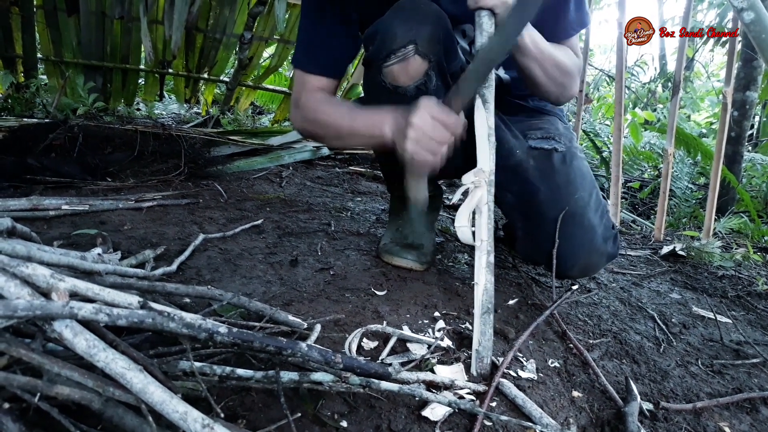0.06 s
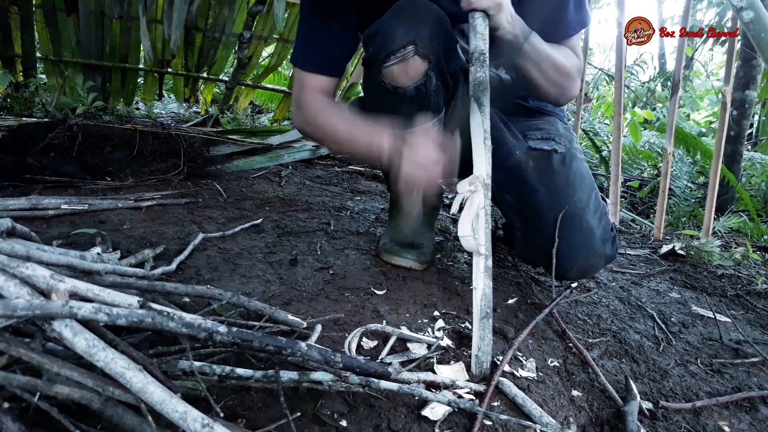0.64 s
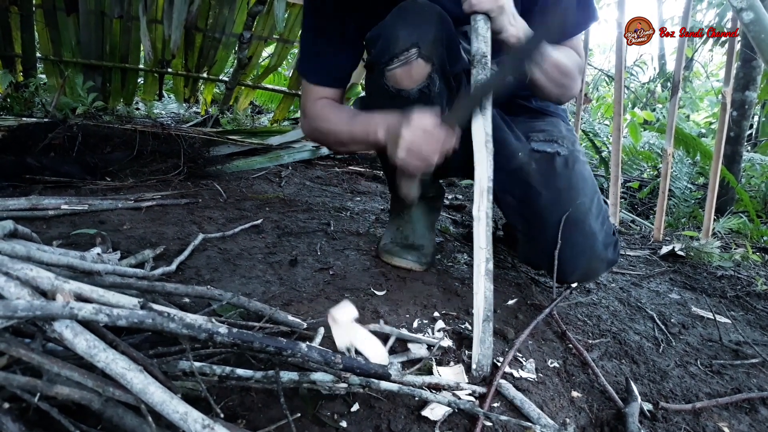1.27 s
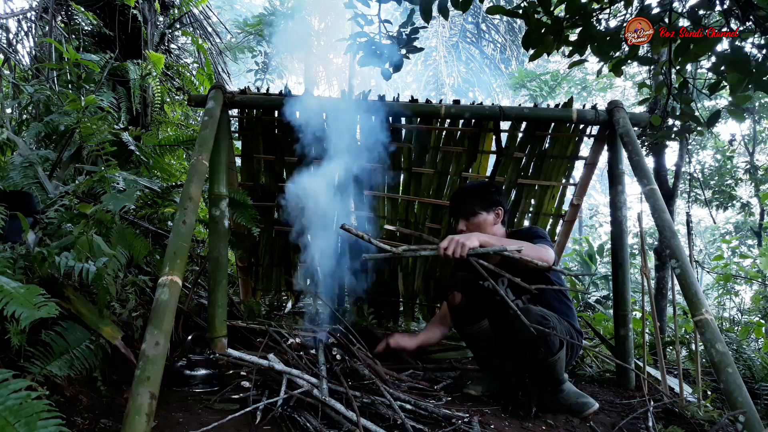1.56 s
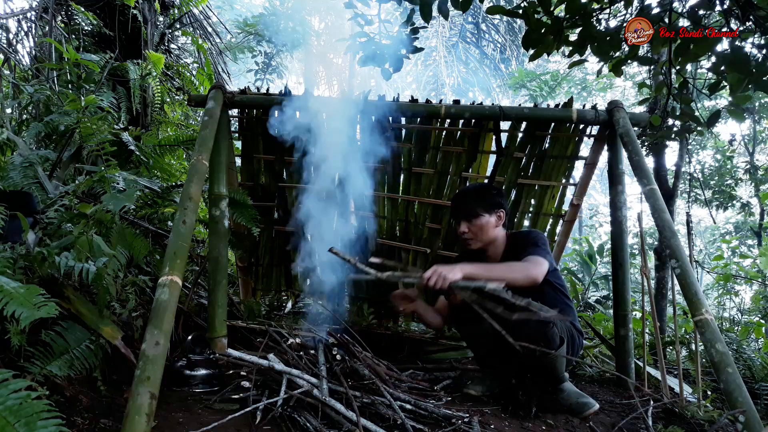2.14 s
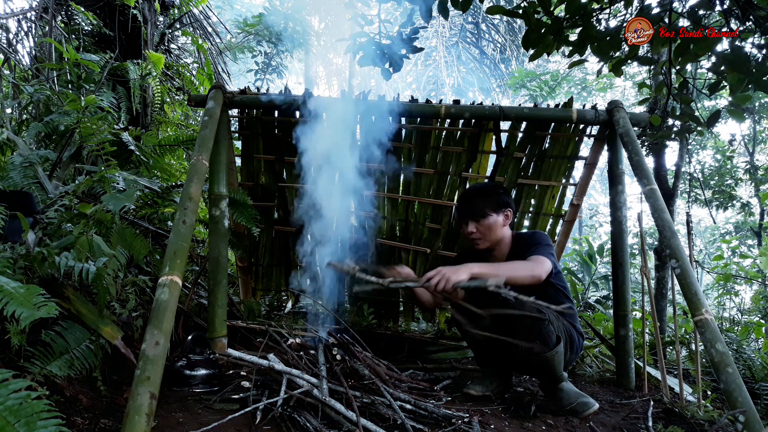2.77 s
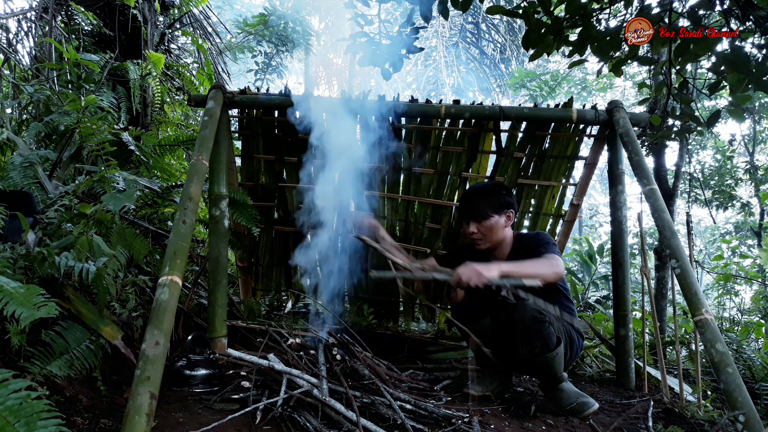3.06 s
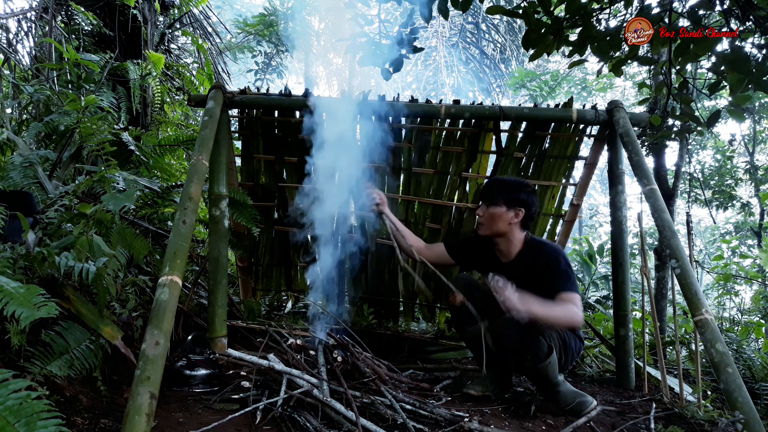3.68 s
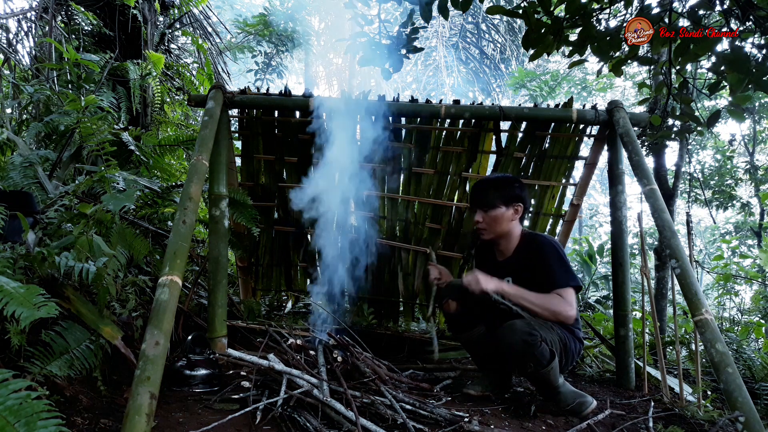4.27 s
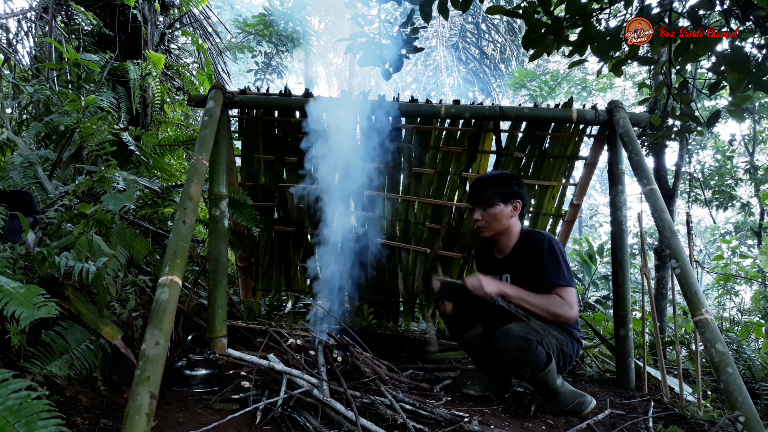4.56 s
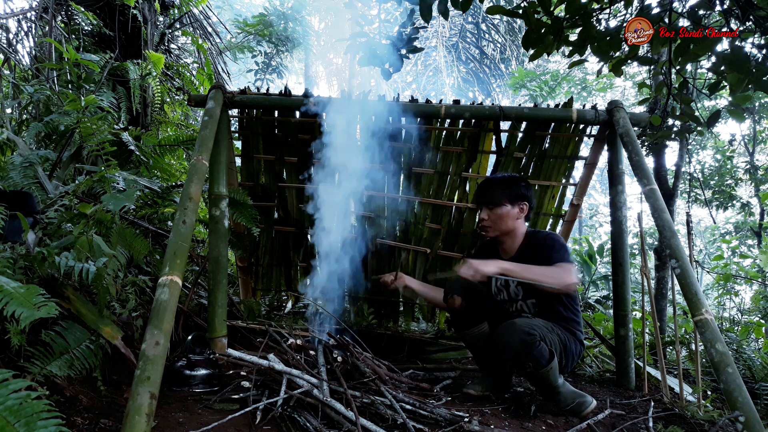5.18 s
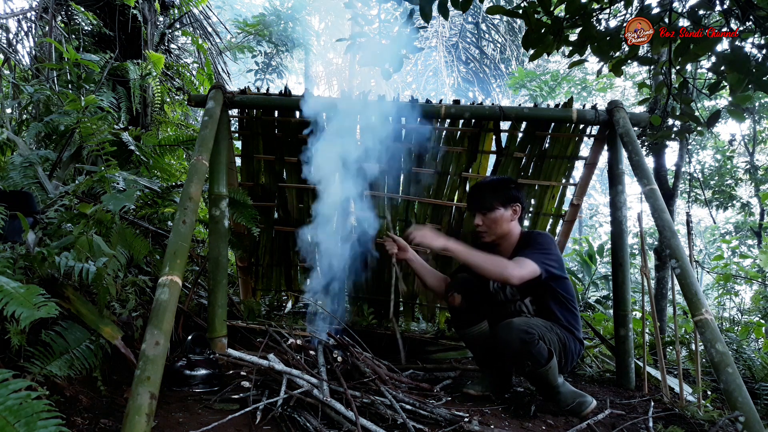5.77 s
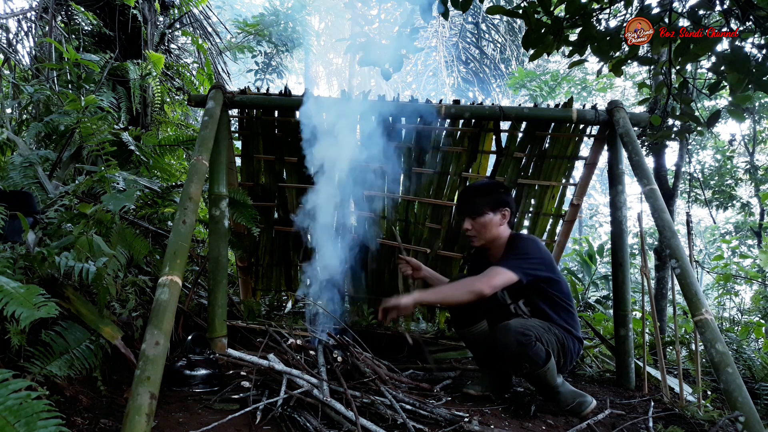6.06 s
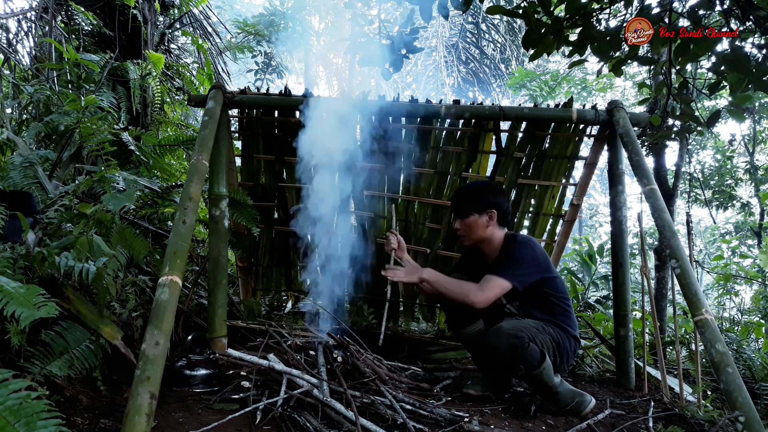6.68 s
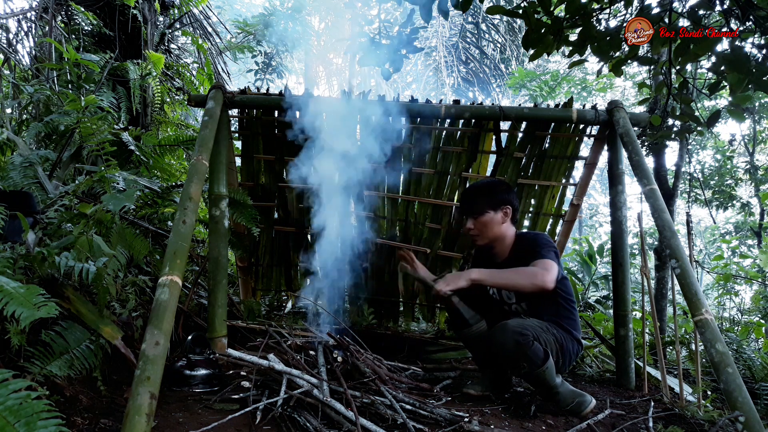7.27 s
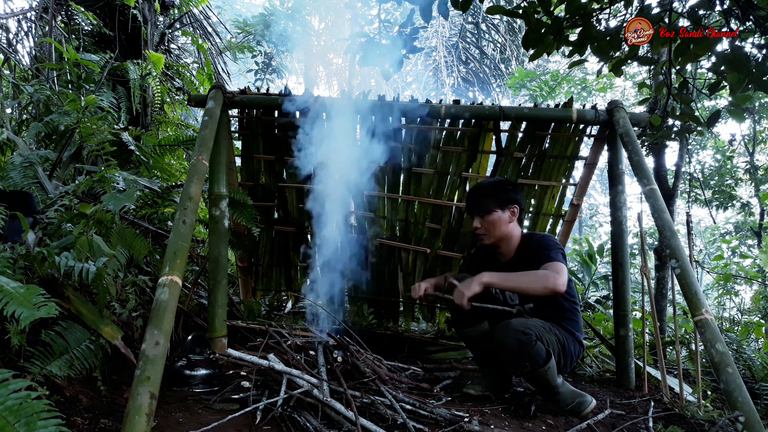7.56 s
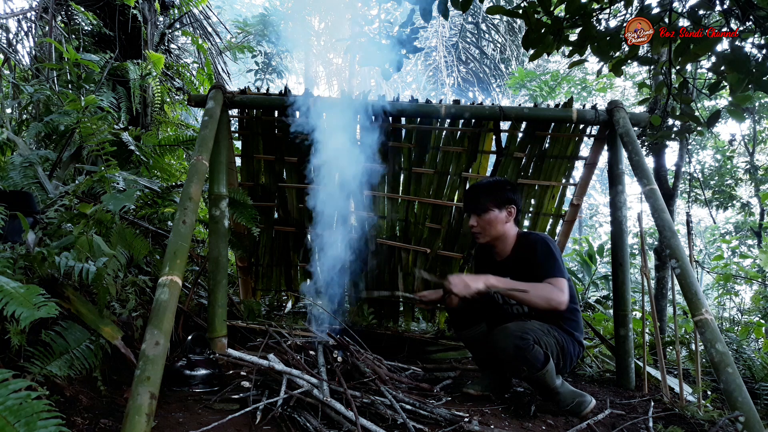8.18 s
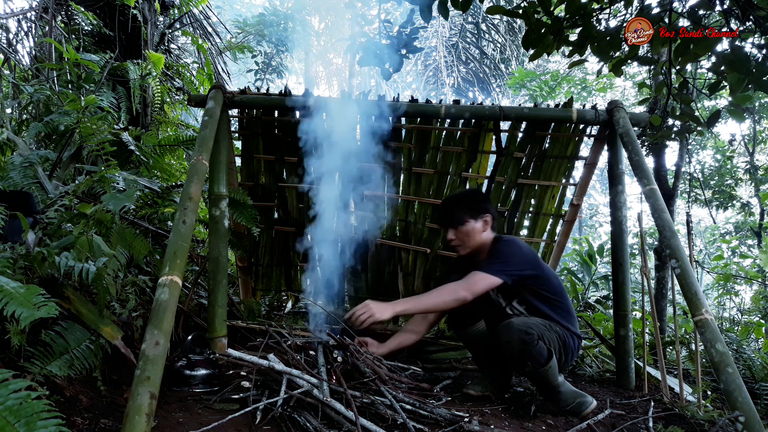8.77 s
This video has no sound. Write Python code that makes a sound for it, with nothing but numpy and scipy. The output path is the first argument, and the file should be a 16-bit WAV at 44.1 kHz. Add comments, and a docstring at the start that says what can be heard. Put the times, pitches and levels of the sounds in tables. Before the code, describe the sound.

A blade chops wood four times, followed by a quietly crackling forest fire, rasping insects, light stick knocks and two sharp twig snaps.

```python
"""Four machete chops ring out over leafy air and a thin insect trill: each impact excites the resonances
of a stake and drives it into soft soil, and the last knocks a chip loose. The scene then changes to a
forest camp, where a wood fire hisses and pops under throbbing insects, sticks knock, and two twigs snap
by brittle fracture, echoed by a bamboo shelter. The sound is mono, and an automatic gain control turns
it down for about a second after each loud burst."""
import sys
import numpy as np
from scipy import signal
from scipy.fft import rfft, irfft, next_fast_len
from scipy.io import wavfile
from scipy.ndimage import uniform_filter1d, minimum_filter1d

SR = 44100
rng = np.random.default_rng(int(sys.argv[2]) if len(sys.argv) > 2 else 0)


def to_wav(sig):
    """Store sig (one row per channel, or 1-D mono) as 16-bit WAV at the path in sys.argv[1].

    Samples outside -1..1 are clipped; the rate is SR.
    """
    pcm = np.clip(np.atleast_2d(sig), -1, 1) * 32767
    pcm = np.round(pcm).astype(np.int16)
    wavfile.write(sys.argv[1], SR, pcm.T)  # frames by channels


N = 393813
T = np.arange(N) / SR
CAMP_START_S = 1.468


def undb(db):
    """Decibels to amplitude ratio."""
    return 10 ** (np.asarray(db) / 20)


def unit(x):
    """Normalisation to rms 1."""
    return x / np.sqrt(np.mean(x ** 2))


def with_energy(x, db, length):
    """Equal energy: scale a burst to match a level of db held for length seconds."""
    return x * undb(db) * np.sqrt(length * SR / np.sum(x ** 2))


def decay(t, t60):
    """Exponential damping by 60 dB in t60 seconds."""
    return np.exp(-np.log(1000) * t / t60)


def add(out, s, x):
    """Superposition: mix x into out from time s on."""
    i = max(int(s * SR), 0)
    out[i:i + len(x)] += x[:max(N - i, 0)]


def colour(x, points, taps=2048):
    """Minimum-phase filter through points of (frequency [Hz], gain [dB])."""
    hz, db = np.transpose(points)
    bins_hz = np.arange(taps + 1) * SR / (2 * taps)
    log_gain = np.log(undb(np.interp(np.log(bins_hz + 1), np.log(hz), db)))
    cepstrum = irfft(log_gain)[:taps]
    cepstrum[1:] *= 2
    response = irfft(np.exp(rfft(cepstrum, 2 * taps)))[:taps]
    return signal.fftconvolve(x, response)[:len(x)]


def resonate(x, hz, width):
    """Second-order resonance with gain 1 at its centre and a bandwidth in Hz."""
    return signal.lfilter(*signal.iirpeak(hz, hz / width, fs=SR), x)


def shelve(x, corner_hz, below_db, above_db):
    """Shelving filter: one gain below the corner, another above."""
    return colour(x, [(corner_hz / 1.2, below_db), (corner_hz * 1.2, above_db)])


def drift(rate):
    """Random modulation: linear interpolation through rate Gaussian values a second."""
    knots = np.arange(0, N / SR + 1, 1 / rate)
    return np.interp(T, knots, np.resize(rng.standard_normal(8192), len(knots)))


def rasp(hz, width):
    """Incoherent summation: many small rasps blur into a bell-shaped band of noise."""
    size = next_fast_len(N, real=True)
    detune = (np.arange(size // 2 + 1) * SR / size - hz) / width
    bell = .5 ** np.minimum(2 * detune ** 2, 20)
    return unit(irfft(rfft(rng.standard_normal(size)) * bell, size)[:N])


def fracture(length, grit_db, size=4096):
    """Broadband excitation: fibres fail in a run of uneven clicks that fades over length seconds."""
    fade = np.exp(-(np.arange(size) / SR / length) ** 2)
    clicks = rng.choice([-1, 1], size) * undb(grit_db * rng.standard_normal(size)) * fade
    for _ in range(3):  # flatten the spectrum, so that the wood alone gives the colour
        spectrum = rfft(clicks)
        clicks = irfft(spectrum / (np.abs(spectrum) + 1e-9)) * np.sqrt(fade)
    return clicks


def scatter(delay, rise, early_t60, late_db, late_t60=.33, size=14400):
    """Diffuse reflection: a close cluster of echoes off poles and leaves, then a tail from the trees."""
    t = np.maximum(np.arange(size) / SR - delay, 0)
    fade = decay(t, early_t60) + undb(late_db) * decay(t, late_t60)
    return rng.standard_normal(size) * fade * (1 - np.exp(-t / rise))


# spectrum of the air in a bamboo grove (frequency [Hz], relative level [dB])
GROVE_SPECTRUM = [(20, -40), (45, -14), (80, -5.5), (190, 1.5), (400, -5.5), (1200, -6.5), (2700, -9),
                  (4100, -6), (5200, -12), (7200, -15.5), (8800, -15), (11100, -17), (12600, -29),
                  (15500, -34)]
def grove_air():
    """Filtered noise: leafy air with a slight flutter in level."""
    return unit(colour(rng.standard_normal(N), GROVE_SPECTRUM)) * undb(-40.5 + .5 * drift(25))


# spectrum of the fire and the forest around it (frequency [Hz], relative level [dB])
HISS_SPECTRUM = [(25, -61), (50, -13.5), (90, -4), (200, 1.5), (450, -2), (800, -1), (2000, -7.5),
                 (4800, -9), (6500, -15.5), (10000, -18.5), (12700, -23.5), (15500, -24)]
def camp_hiss():
    """Filtered noise: fire and forest merge into a nearly steady hiss."""
    return unit(colour(rng.standard_normal(N), HISS_SPECTRUM)) * undb(-41 + .66 * drift(9))


# trills of one insect (start [s], end [s], frequency [Hz], level [dB])
INSECT_TRILLS = [(.32, .716, 3440, -45), (0.727, 0.98, 3250, -46), (1.195, 1.477, 3460, -46),
                 (1.268, 1.47, 3230, -46)]
def trills():
    """Gated narrow-band noise: an insect's rough trill wavers between two pitches."""
    out = np.zeros(N)
    for start, end, hz, db in INSECT_TRILLS:
        gate = np.clip(np.minimum(T - start, end - T) / .023, 0, 1)
        out += undb(db + 1.6 * drift(28.5)) * rasp(hz, width=160) * gate
    return out


# bands of two insect choirs (frequency [Hz], bandwidth [Hz], level [dB], throb depth [dB])
LOW_RASPS = [(4650, 110, -60.5, -2), (8480, 1340, -50, 2.1), (9440, 1200, -56, -2)]
HIGH_RASPS = [(10640, 850, -56, 0.57), (11340, 700, -61.5, 4.1)]
def choir(bands, throb_hz, crest_s):
    """Amplitude modulation: insects rasp to a loose beat; bands of negative depth swell in antiphase."""
    throb = np.cos(2 * np.pi * (throb_hz * (T - crest_s) + .05 * drift(1.76)))
    return sum(rasp(hz, width) * undb(db + depth_db * throb + .24 * drift(8))
               for hz, width, db, depth_db in bands)


# the blade drawn back along the wood (time [s], level [dB], half-width [s])
BLADE_SCRAPES = [(.28, -42.5, 0.018), (.5, -45, 0.024), (.85, -41, 0.02), (1.24, -42, .008)]
def scrapes():
    """Sliding friction: the blade rasps over the cut as it is pulled free."""
    swells = sum(undb(db) * np.exp(-((T - s) / half_s) ** 2) for s, db, half_s in BLADE_SCRAPES)
    return rasp(hz=4750, width=3000) * swells * undb(2.5 * drift(400))


# sticks knocked together and laid down (time [s], level [dB], resonance [Hz])
STICK_KNOCKS = [(2.8275, -41, 5500), (2.9801, -33, 3750), (3.454, -41, 1890), (3.641, -35.5, 1600)]
def knocks():
    """Damped resonance: a light blow rings a stick briefly, over a broad clack."""
    out = np.zeros(N)
    for s, db, hz in STICK_KNOCKS:
        blow = fracture(.0045, grit_db=7)
        echo = scatter(delay=.003, rise=.002, early_t60=.08, late_db=-22, late_t60=.15, size=len(blow))
        drive = unit(blow) + undb(-3) * unit(echo)
        stick = resonate(drive, hz, width=250) + undb(-5) * resonate(drive, hz, width=2500)
        add(out, s, with_energy(stick, db, .0066))
    return out


# spectrum of cracking dry wood (frequency [Hz], gain [dB])
CRACK_SPECTRUM = [(100, -26), (700, -21), (1500, -17), (2200, -10), (3300, -2.5), (5700, -0.5), (8300, 2.5),
                  (9800, -10), (12000, -7.5), (15500, -4.5)]
SHELTER_ECHO_DB = -10.5  # added to a small crack's level to give its echo level
def cracks(events, length, delay, early_t60, late_db, rattle_db):
    """Brittle fracture: dry wood breaks in about a millisecond and rattles; the shelter echoes it.
    Events are (time [s], level [dB], echo level [dB], brightness [dB], resonance [Hz])."""
    out = np.zeros(N)
    for s, db, echo_db, bright_db, ring_hz in events:
        crack = fracture(length, grit_db=2) + undb(rattle_db) * fracture(.006, grit_db=2)
        echo = scatter(delay, .0004, early_t60, late_db)
        for burst, level_db, span_s in ((crack, db, .0024), (echo, echo_db, .017)):
            wood = colour(burst, CRACK_SPECTRUM)
            wood += undb(2.5) * resonate(wood, ring_hz, width=2900)
            add(out, s, with_energy(shelve(wood, 8900, 0, bright_db), level_db, span_s))
    return out


# louder pops of the burning wood (time [s], level [dB], brightness [dB], resonance [Hz])
FIRE_POPS = [(1.988, -25.5, 8, 3200), (1.9991, -27, 4, 7600), (2.2729, -24, 7, 4200),
             (3.8876, -24, 7.5, 4200), (4.2286, -27, 13, 3800), (5.7627, -23, 12.5, 4500),
             (6.9501, -34, 12, 6000), (7.1631, -28.5, 3, 8300), (7.418, -29, 14, 5500),
             (8.532, -30.5, 7, 3500), (8.691, -33, 4, 8000), (8.7221, -32, 10, 9000)]
def fire(embers=45):
    """Impulsive noise: burning wood pops, and faint embers tick at random times."""
    when, strength, tone = rng.random((embers, 3)).T
    tick_db = -55 + 16 * strength ** 2
    ticks = np.transpose([when * N / SR, tick_db, tick_db - 15, 12 * (tone - .5), 3000 + 5000 * tone])
    pops = [(s, db, db + SHELTER_ECHO_DB, bright_db, hz) for s, db, bright_db, hz in FIRE_POPS]
    return cracks([*pops, *ticks], length=.00093, delay=.0016, early_t60=.14, late_db=-14, rattle_db=-5)


# twigs snapped by hand (time [s], break level [dB], resonance [Hz], first crack level [dB],
# splinter lag [s], splinter level [dB])
TWIG_SNAPS = [(4.582, -9, 2530, -29, .0555, -16.5), (7.9431, -8, 5700, -13.5, .1028, -14.5)]
def twigs(spray_db=-10.5, reflection_db=-24, bright_db=4):
    """Progressive failure: a twig cracks, breaks with echoes and one late reflection, then splinters."""
    firsts, breaks, splinters = [], [], []
    for s, db, hz, first_db, lag_s, splinter_db in TWIG_SNAPS:
        firsts.append((s - .0137, first_db, first_db - 19, 0, 5000))
        breaks.append((s, db, spray_db, bright_db, hz))
        breaks.append((s + .062, reflection_db, reflection_db + SHELTER_ECHO_DB, bright_db, hz))
        splinters.append((s + lag_s, splinter_db, splinter_db + SHELTER_ECHO_DB, 8, 5500))
    return (cracks(firsts, length=.0016, delay=.0036, early_t60=.08, late_db=-12, rattle_db=-4)
            + cracks(breaks, length=.00059, delay=.0067, early_t60=.082, late_db=-7.5, rattle_db=-2.5)
            + cracks(splinters, length=.0013, delay=.0042, early_t60=.1, late_db=-12, rattle_db=-5))


def thump(start_hz=130, end_hz=58, sag_s=.031, rise_s=.0073, size=8192):
    """Damped oscillation: the stake bounces on crumbling soil, its pitch falling as pressure lets go."""
    t = np.arange(size) / SR
    hz = end_hz + (start_hz - end_hz) * np.exp(-(t / sag_s) ** 2)
    bounce = np.sin(2 * np.pi * np.cumsum(hz) / SR)
    soil = unit(colour(rng.standard_normal(size), [(25, -26), (50, 3), (220, 4), (500, -23), (1500, -45)]))
    envelope = (1 - np.exp(-t / rise_s)) * decay(t, t60=.12)
    return envelope * (bounce + undb(-6) * soil)


# spectrum of tearing wood fibres (frequency [Hz], gain [dB])
FIBRE_SPECTRUM = [(60, -18), (200, -1.5), (500, 0.5), (1300, 1), (2700, 0.5), (4000, 3), (6000, 4),
                  (8000, -2.5), (10000, -13), (12000, -3), (16000, -25)]
# modes of stake and blade (frequency [Hz], bandwidth [Hz], gain [dB])
IMPACT_MODES = [(400, 210, -1), (550, 100, 7.5), (772, 48, 9.5), (1900, 220, -1), (3620, 200, 4),
                (4060, 170, 1), (4900, 120, 7), (5760, 260, -9), (7360, 47, 12)]
def contact(db, length, body_db, bright_db, splinter_hz):
    """Modal response: tearing fibres excite the resonances of stake, blade and a splinter."""
    tear = fracture(length, grit_db=5.5)
    modes = sum(undb(mode_db) * resonate(tear, hz, width) for hz, width, mode_db in IMPACT_MODES)
    splinter = undb(11.5) * resonate(tear, splinter_hz, width=290)
    wood = colour(tear, FIBRE_SPECTRUM) + modes + splinter
    wood = shelve(wood, 1700, body_db, 0)
    wood = shelve(wood, 7100, 0, bright_db)
    return with_energy(wood, db, length)


# a chip tumbling onto sticks (time [s], level [dB], length [s], brightness [dB], resonance [Hz])
CHIP_BOUNCES = [(1.023, -21.5, 0.014, -5, 4400), (1.0536, -27, 0.0059, 0, 6430),
                (1.065, -20, 0.0059, -10, 1500)]
# machete strokes (time [s], bite level [dB], split level [dB], body gain [dB], split brightness [dB],
# splinter resonance [Hz], thump level [dB])
MACHETE_STROKES = [(0.1465, -18, -27.5, 5, 9, 4600, -22), (0.4182, -22.5, -12.5, 6, 5, 5760, -21.5),
                   (0.7011, -17.5, -9, 4.5, 2, 4060, -19.5), (0.9858, -17, -12, 0.5, -5, 3580, -36)]
def machete(graze_lead_s=.0178, split_lag_s=.0046, thump_lag_s=.002):
    """Impact excitation: each stroke grazes, bites, splits and drives the stake; the last frees a chip."""
    wood = np.zeros(N)
    for s, bite_db, split_db, body_db, bright_db, splinter_hz, _ in MACHETE_STROKES:
        add(wood, s - graze_lead_s, contact(-35, .02, body_db=3.5, bright_db=-7, splinter_hz=1520))
        add(wood, s, contact(bite_db, .0047, body_db, bright_db=-3.5, splinter_hz=2000))
        add(wood, s + split_lag_s, contact(split_db, .0045, body_db - 5, bright_db, splinter_hz))
    for s, db, length, bright_db, hz in CHIP_BOUNCES:
        add(wood, s, contact(db, length, body_db=-7.5, bright_db=bright_db, splinter_hz=hz))
    # the stems of the grove scatter the sound back, mostly its treble
    stems = scatter(delay=.0022, rise=.0011, early_t60=.083, late_db=-13.5)
    echo = signal.fftconvolve(wood, with_energy(stems, db=-7, length=1 / SR))[:N]
    out = wood + shelve(echo, 1000, below_db=-7, above_db=1.5)
    for s, *_, thump_db in MACHETE_STROKES:
        add(out, s + thump_lag_s, undb(thump_db) * thump())
    return out


def scene():
    """Superposition of the sources in each place: first the chopping, then at once the camp."""
    chopping = machete() + scrapes() + grove_air() + trills()
    insects = choir(LOW_RASPS, throb_hz=3.6, crest_s=1.744)
    insects += choir(HIGH_RASPS, throb_hz=2.945, crest_s=1.553)
    camp = camp_hiss() + insects + fire() + twigs() + knocks()
    return np.tile(np.where(T < CAMP_START_S, chopping, camp), (2, 1))


def gain_control(x, depth_db, glide_s, threshold_db=-20, knee_db=4, hold_s=1.126):
    """Dynamic compression: a loud burst makes the gain glide down, hold and glide back."""
    level_db = 10 * np.log10(np.abs(uniform_filter1d(x ** 2, SR // 50)) + 1e-12)
    wanted = undb(depth_db * np.clip((level_db - threshold_db) / knee_db, 0, 1))
    hold = int(hold_s * SR)
    held = minimum_filter1d(wanted, hold, origin=(hold - 1) // 2, mode="nearest")
    step = 1 / (glide_s * SR)
    gain = 1 + signal.lfilter([step], [1, step - 1], held - 1)
    return x * gain


def record(dry):
    """Compression, separate for each place, then clipping at full scale and band limiting."""
    chopping, camp = np.split(dry[0], [int(CAMP_START_S * SR)])
    mono = np.concatenate([gain_control(chopping, depth_db=-8, glide_s=.5),
                           gain_control(camp, depth_db=-11, glide_s=.22)])
    low_pass = signal.ellip(10, .2, 70, 15800, fs=SR, output="sos")
    return np.tile(signal.sosfilt(low_pass, np.clip(mono, -1, 1)), (2, 1))


dry = scene()
out = record(dry)
to_wav(out)
```